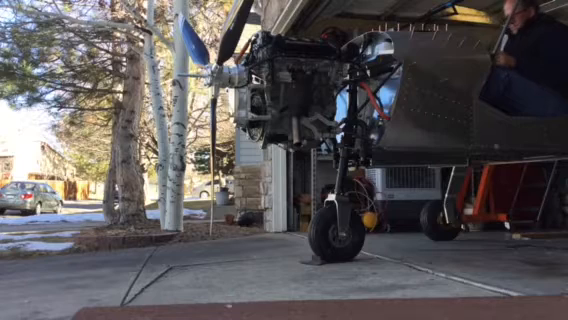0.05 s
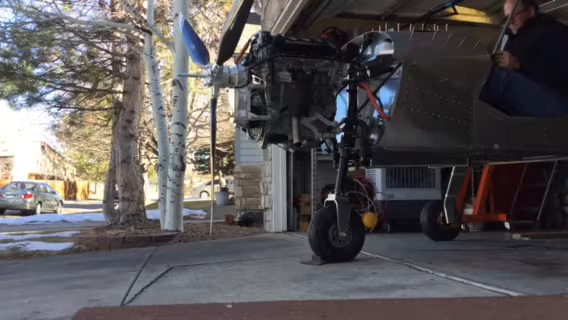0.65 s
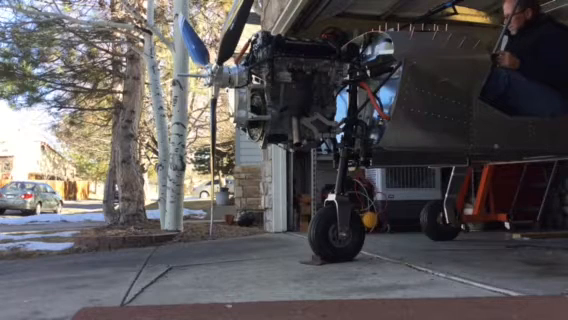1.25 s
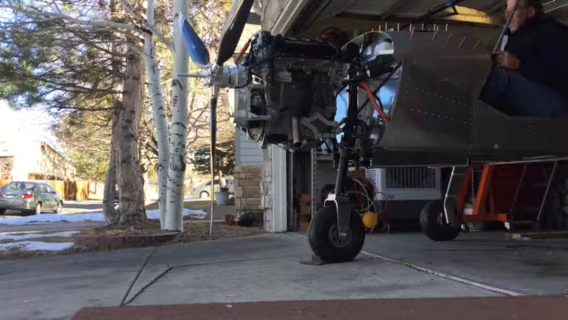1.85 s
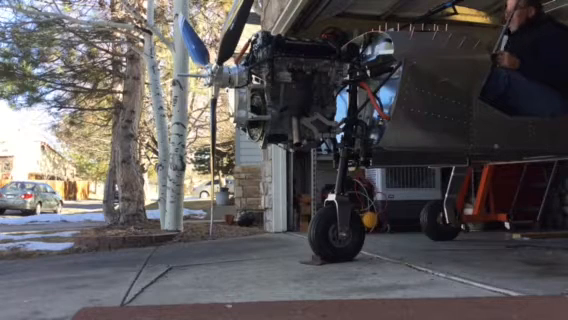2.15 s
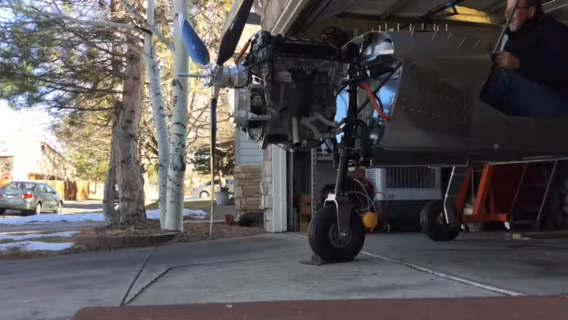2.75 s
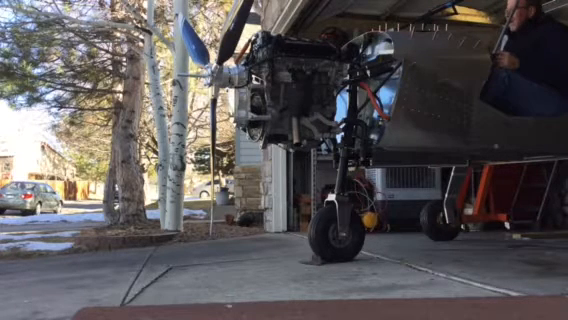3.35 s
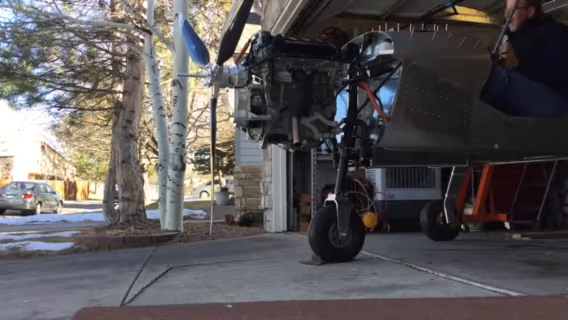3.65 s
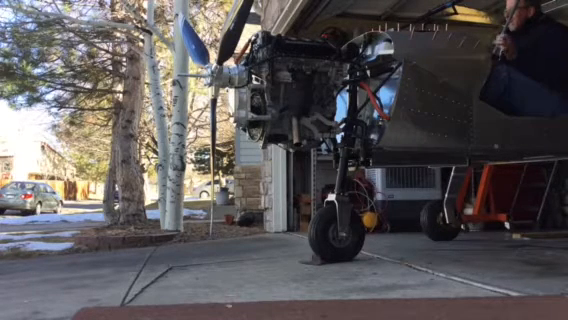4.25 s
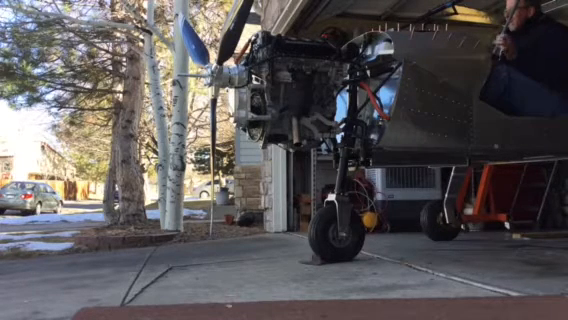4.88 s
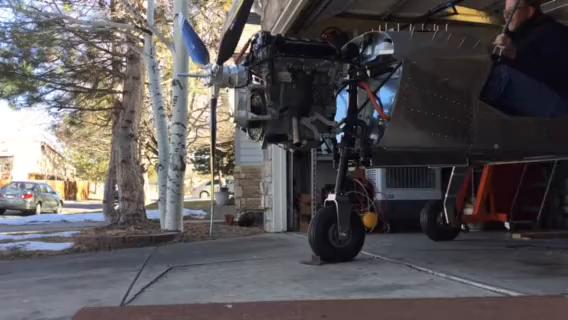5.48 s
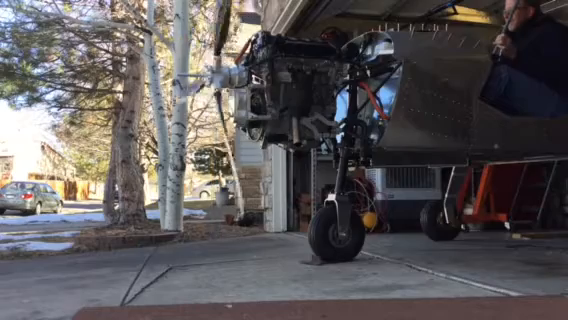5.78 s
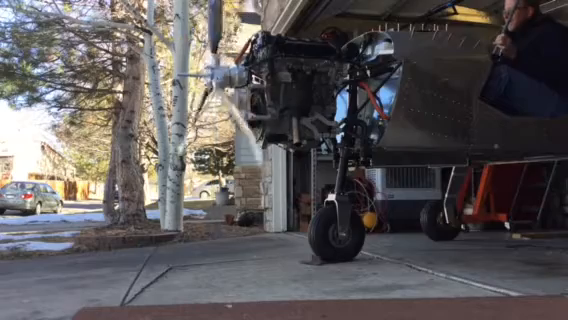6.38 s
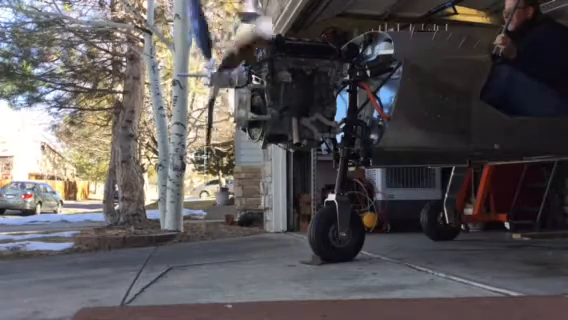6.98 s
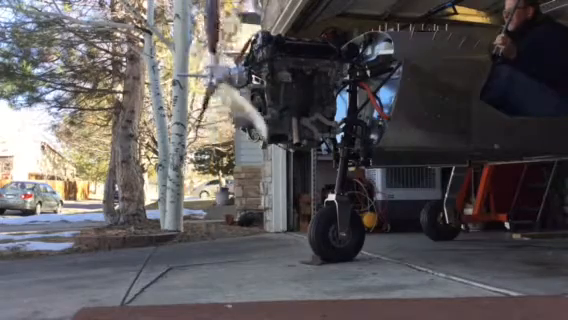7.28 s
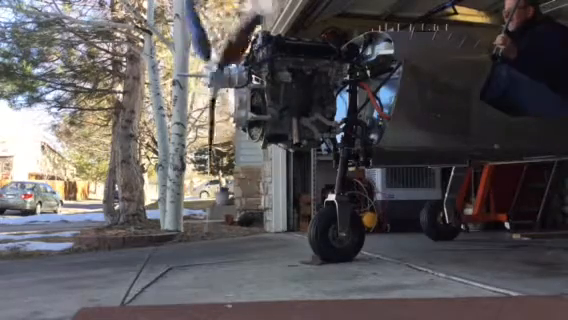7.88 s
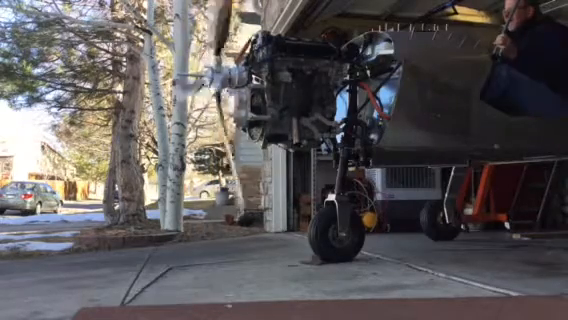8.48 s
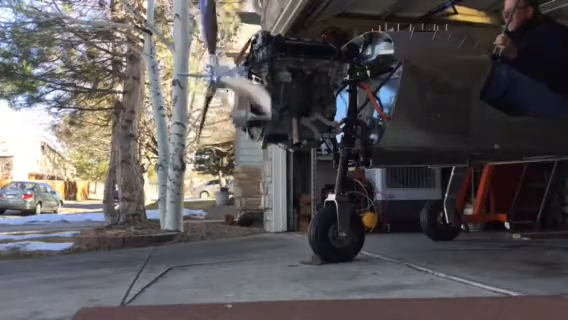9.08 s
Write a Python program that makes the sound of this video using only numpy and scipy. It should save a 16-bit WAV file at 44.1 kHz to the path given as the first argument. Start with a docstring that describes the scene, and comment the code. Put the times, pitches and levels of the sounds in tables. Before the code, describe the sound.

A low rumble and light clicks, then a starter clacks in and cranks a small aircraft engine with ringing metallic chatter, never firing.

```python
"""A low rumble with a faint hum and a few light clicks, in an open garage where a small aircraft engine
stands. Then the starter pinion slams in and cranks engine and propeller without a firing.
The gears slow and groan on every compression, rattle loose in between,
and keep the steel ring gear ringing."""
import sys
import numpy as np
from scipy import signal
from scipy.fft import rfft, irfft
from scipy.io import wavfile
from scipy.ndimage import uniform_filter1d

SR = 44100
rng = np.random.default_rng(int(sys.argv[2]) if len(sys.argv) > 2 else 0)


def dump_mix(stems):
    """Bounce the given channels to the path in sys.argv[1] as a 16-bit WAV at rate SR."""
    frames = np.atleast_2d(stems).T  # one column per channel
    limited = np.clip(frames, -1, 1)  # hard clip at full scale
    pcm = np.round(limited * 32767).astype(np.int16)
    wavfile.write(sys.argv[1], SR, pcm)


N = 407043
T = np.arange(N) / SR


def undb(db):
    """Decibels to gain."""
    return 10 ** (np.asarray(db) / 20)


def unit(x):
    """Scale to rms 1 over the time in which it sounds."""
    sounding = np.abs(x) > np.abs(x).max() * 1e-4
    return x / np.sqrt(np.mean(x[sounding] ** 2))


def curves(table):
    """Table columns interpolated over time."""
    time_s, *columns = np.transpose(table)
    return [np.interp(T, time_s, column) for column in columns]


def walk(rate_hz):
    """Smooth random wander, rms 1."""
    hold = int(SR / rate_hz)
    steps = np.repeat(rng.standard_normal(N // hold + 1), hold)
    return unit(uniform_filter1d(steps, hold)[:N])


def colour(x, points, size=8192):
    """Minimum-phase filter through (freq_hz, gain_db) points."""
    hz, db = np.transpose(points)
    bins_hz = np.maximum(np.arange(size // 2 + 1) * SR / size, 1)
    gain = undb(np.interp(np.log(bins_hz), np.log(hz), db))
    cepstrum = irfft(np.log(gain))
    cepstrum[1:size // 2] *= 2
    cepstrum[size // 2 + 1:] = 0
    return signal.oaconvolve(x, irfft(np.exp(rfft(cepstrum))))[:len(x)]


def noise(points, envelope=1):
    """Enveloped, coloured noise, rms 1."""
    return unit(colour(rng.standard_normal(N) * envelope, points))


def ring(x, modes):
    """Parallel resonators; alternating signs keep the valleys smooth."""
    return sum((-1) ** k * undb(db) * signal.lfilter(*signal.iirpeak(hz, hz / width_hz, fs=SR), x)
               for k, (hz, width_hz, db) in enumerate(modes))


def fade(t, t60_s):
    """Decay by 60 dB in t60_s."""
    return np.exp(-np.log(1000) * t / t60_s)


# Rumble levels: time_s, deep_db, upper_db
RUMBLE_LEVELS = [(0.0, -32, -36), (0.8, -33.5, -38), (1.7, -36, -38), (2.3, -38, -37), (2.65, -35.5, -33.5),
                 (3.3, -41.5, -36.0), (4.2, -38, -36.5), (5.0, -44.5, -39.6), (6.0, -45, -38),
                 (6.55, -37, -37.5), (7.05, -42, -41.5), (7.3, -34, -37.5), (8.1, -36, -35),
                 (8.8, -37.5, -39), (9.23, -36.5, -32.5)]
# Rumble band spectra: freq_hz, gain_db
DEEP_SPECTRUM = [(20, -29), (32, -21), (50, 0), (62, 3.5), (86, 9), (115, 1.5), (150, -15), (300, -42.5),
                 (1000, -81)]
UPPER_SPECTRUM = [(20, -62), (70, -35.5), (130, 1), (160, -3), (195, -4), (235, -12), (310, -26),
                  (450, -30.5), (1200, -71)]
def rumble():
    """Two low noise bands that flutter together."""
    deep_db, upper_db = curves(RUMBLE_LEVELS)
    flutter = undb(1.67 * walk(32))
    deep = undb(deep_db - .13) * noise(DEEP_SPECTRUM, flutter)
    upper = undb(upper_db - .25) * noise(UPPER_SPECTRUM, flutter)
    return deep + upper


# Hum tones: pitch_hz, level_db
HUM_TONES = [(485, -57.5), (523, -67.5), (786, -65.5), (1308, -75), (3190, -83.5), (3919, -80.5),
             (4177, -82.5)]
def hum():
    """Thin tones, wavering in level and phase."""
    return sum(undb(db + 1.7 * walk(4.024)) * np.sqrt(2) * np.sin(2 * np.pi * hz * T + .35 * walk(20))
               for hz, db in HUM_TONES)


# Air spectrum: freq_hz, gain_db
AIR_SPECTRUM = [(100, 13), (220, 32), (260, 38.5), (300, 30.5), (370, 28.5), (450, 18.5), (650, 13.5),
                (900, 6.5), (1250, 7), (1500, -2), (2000, -6.5), (3000, -7.5), (4800, -4), (7300, -13),
                (9500, -6.5), (12000, -1), (16000, -14)]
def air(level_db=-45.5):
    """The steady hush of still air."""
    return undb(level_db) * noise(AIR_SPECTRUM)


# Buzz spectrum: freq_hz, gain_db
BUZZ_SPECTRUM = [(200, -32), (1100, -5), (1700, -1), (2600, 1.5), (3500, -6), (5000, 1), (7000, -13),
                 (16000, -25)]
def buzz(pitch_hz=43.3, level_db=-70.5):
    """A faint buzz: one rough cycle repeating at a wavering rate."""
    phase = np.cumsum(pitch_hz * (1 + .001 * walk(1.5))) / SR % 1
    cycle = rng.standard_normal(1024)
    wave = cycle[(phase * len(cycle)).astype(int)]
    return undb(level_db) * unit(colour(wave, BUZZ_SPECTRUM))


def knocks(table, spectrum, t60_s, tail_db, tail_t60_s):
    """Short cracks, each with a ping and a brief room tail."""
    out, t = np.zeros(N), T[:SR // 2]
    envelope = fade(t, t60_s) + undb(tail_db) * fade(t, tail_t60_s)
    for start_s, gain_db, ping_hz, ping_db, ping_t60_s in table:
        crack = colour(rng.standard_normal(len(t)) * envelope, spectrum)
        ping = undb(ping_db) * np.sin(2 * np.pi * ping_hz * t) * fade(t, ping_t60_s)
        i = int(start_s * SR)
        out[i:i + len(t)] += 2 * undb(gain_db) * (crack + ping)
    return out


# Clicks: start_s, gain_db, ping_hz, ping_db, ping_t60_s
CLICK_HITS = [(.1505, -35.5, 1340, 0, 0.033), (.548, -36, 5530, -9, .13), (.55, -31.5, 5500, 1, .012),
              (.5535, -33.5, 840, -17, 0.025), (2.8, -62, 1600, 6, .02)]
# Click spectrum: freq_hz, gain_db
CLICK_SPECTRUM = [(30, -36), (200, -4), (500, 5.5), (950, 10.5), (1700, 2), (2500, -8), (4000, 0),
                  (5600, 0), (6800, -14), (12000, -11.5), (16000, -15)]
def clicks():
    """Two light clicks, later a much fainter tick."""
    return knocks(CLICK_HITS, CLICK_SPECTRUM, t60_s=.018, tail_db=-13, tail_t60_s=.19)


# Solenoid and pinion impacts: start_s, gain_db, ping_hz, ping_db, ping_t60_s
PINION_HITS = [(5.7755, -44, 1295, 5, 0.042), (5.7865, -19, 1260, -5, 0.043),
               (5.795, -16, 1125, -31, 0.088), (5.803, -32, 1000, 2, 0.16)]
# Impact spectrum: freq_hz, gain_db
PINION_SPECTRUM = [(100, -2), (600, -7.5), (1100, 5), (1500, 2), (2400, -6), (4000, -0.5), (7000, -9),
                   (9500, -19), (12500, -11), (16000, -30)]
def pinion_slam():
    """The solenoid throws the pinion into the ring gear."""
    return knocks(PINION_HITS, PINION_SPECTRUM, t60_s=.055, tail_db=-6.5, tail_t60_s=.42)


TURN_S = .23126  # one crank turn at full cranking speed
def compressions(beat_from_s=5.9248, limp_s=.002):
    """Two compressions a turn, every second one late; the first few are slower and heavier."""
    k = np.arange(int((T[-1] - beat_from_s) / TURN_S * 2) + 1)
    run_up, second = np.exp(-k / .85), k % 2
    times_s = beat_from_s + k * TURN_S / 2 + limp_s * second - .04 * run_up
    load_db = .6 + 3 * run_up
    chatter_db = np.where(second, 0, 4.7)
    return times_s, load_db, chatter_db


def strokes(delay_s, width_s, gain_db=0):
    """A smooth hump at each compression, wider while the crank is slow."""
    times_s = compressions()[0]
    slowness = np.gradient(times_s) / np.median(np.diff(times_s))
    grid_s = T[::50]
    humps = np.exp(-.5 * ((grid_s[:, None] - times_s - delay_s) / (width_s * slowness ** 2)) ** 2)
    return np.interp(T, grid_s, np.sum(undb(gain_db) * humps, axis=1))


def teeth(tooth_phase, scatter_db):
    """One impact of random size each time a tooth meets."""
    hits = np.flatnonzero(np.diff(np.floor(tooth_phase)) > 0)
    out = np.zeros(N)
    out[hits] = undb(scatter_db * rng.uniform(-1.03, 1, len(hits)))
    return out / np.sqrt(np.mean(out[hits[0]:] ** 2))


def cylinder_puffs():
    """The cylinders push out a soft puff of air on each stroke."""
    return undb(-46) * noise(DEEP_SPECTRUM, strokes(delay_s=.00075, width_s=.0054))


# Gear whine: tooth_harmonic, gain_db
WHINE_HARMONICS = [(1, -8.5), (2, -2.5), (3, -5.5), (4, -33), (5, -15.5), (6, -26)]
def gear_groan(tooth_phase, load, speed):
    """The mesh groans under load; its third harmonic sings between strokes."""
    whine = sum(undb(db + 2.7 * walk(160)) * np.sin(2 * np.pi * k * tooth_phase)
                for k, db in WHINE_HARMONICS)
    groan = undb(-26) * whine * (load + .024) * speed ** 3
    sing = undb(-32.5) * np.sin(2 * np.pi * 3 * tooth_phase) * strokes(delay_s=.042, width_s=.0052)
    return groan + sing


# Crankcase response: freq_hz, gain_db
CASE_SPECTRUM = [(150, -1), (400, 0.5), (600, -4.5), (850, -3), (1050, 8), (1300, 1.5), (1750, 8.5),
                 (2050, 3.5), (2400, 9.5), (2680, -15.5), (3600, -7), (5500, 1), (8000, -21), (16000, -54)]
# Starter mount bending modes: freq_hz, width_hz, gain_db
MOUNT_MODES = [(2251, 10, 0), (2525, 25, -19), (2975, 30, -11), (3309, 30, -3), (3810, 50, -12)]
def case_and_mount(tooth_phase, scrape, drive, load):
    """Loaded teeth strike and scrape, shaking the crankcase and bending the mount."""
    force = (teeth(tooth_phase, scatter_db=8) + 2.5 * scrape) * drive
    case = undb(-33.5) * unit(colour(force * (load + .16), CASE_SPECTRUM))
    mount = undb(-31) * unit(ring(force * drive * (load + .11), MOUNT_MODES))
    return case + mount


# Rattle spectrum: freq_hz, gain_db
RATTLE_SPECTRUM = [(200, 0.5), (360, 4), (600, -6), (1000, -2), (1650, 0.5), (2050, -1), (2350, -0.5),
                   (2680, 0.5), (3300, 0.5), (4200, 5), (4780, -1.5), (5600, 7), (7000, -23), (8200, -9),
                   (11000, -13), (13000, -3.5), (15500, -17.5)]
# Modes of small steel parts: freq_hz, width_hz, gain_db
PART_MODES = [(5860, 100, 2), (6658, 85, 7.5), (6684, 29, 5.5), (7340, 43, -4), (7370, 50, 2.5),
              (7960, 52, -2), (8280, 60, -3.5), (8480, 30, -1.5), (8940, 76, -7.5), (9470, 33, -6),
              (9900, 45, -20), (10400, 250, -9), (11760, 156, -8), (13070, 82, -4.5), (13950, 84, -12.5)]
def backlash_rattle(tooth_phase, scrape, drive, stroke_db):
    """Past the top of each stroke the backlash opens and the teeth chatter."""
    unloaded = np.exp(-.7 * strokes(delay_s=.0038, width_s=.0059))
    slack = unloaded * (.62 + strokes(delay_s=.047, width_s=.034, gain_db=stroke_db))
    bounce_phase = 1.4 * tooth_phase + .25 * walk(400) * (drive > 0)
    bounces = teeth(bounce_phase, scatter_db=1) + 1.8 * scrape
    # the same worn teeth come round on every turn
    wear_db = 2.2 * np.resize(walk(239.5)[:int(TURN_S * SR)], N)
    chatter = bounces * slack * drive ** 3 * undb(wear_db + 1.6 * walk(110))
    rattle = undb(-31.5) * unit(colour(chatter, RATTLE_SPECTRUM))
    return rattle + undb(-27.5) * unit(ring(chatter, PART_MODES))


# Ring gear modes: freq_hz, width_hz, gain_db
GEAR_MODES = [(2251, 11, -7), (2973, 30, -14), (3308, 26, -2), (3808, 32, -8), (3950, 40, -8),
              (4410, 50, -8), (4471, 34, 0), (5058, 16, 0), (5113, 18, 1), (5240, 110, -9), (5789, 24, -11),
              (5965, 70, -12), (6625, 55, -6), (6740, 100, -8)]
def ring_gear(tooth_phase, scrape, drive):
    """Tooth blows keep the steel ringing; each mode wavers in level."""
    blows = (teeth(tooth_phase, scatter_db=8) + 1.6 * scrape) * drive
    ringing = sum(ring(blows, [mode]) * undb(2.5 * walk(80)) for mode in GEAR_MODES)
    return undb(-25) * unit(ringing)


# Clangs, timed from each turn's first compression: offset_s, pitch_hz, peak_db, swell_s, decay_s
TURN_CLANGS = [(-.021, 4471, -20.5, 0.0072, 0.0057), (-.006, 5113, -18.5, 0.0079, 0.0062),
               (.019, 5100, -22, 0.0052, 0.019), (.043, 4471, -22, 0.0073, .018),
               (.08, 6656, -26, 0.0082, 0.0042), (.112, 3808, -35, .008, 0.0036),
               (.12, 2251, -29.5, .003, 0.047), (.124, 3308, -23, 0.0066, 0.0094),
               (.158, 4471, -25.5, 0.0042, 0.004)]
def clangs(speed, spread_hz=73, detune_hz=18.6, others_db=-8.5, scatter_db=1.8):
    """At the same places in each turn the teeth fall in step with a ring gear mode, which swells."""
    out, t = np.zeros(N + SR), np.arange(-SR // 25, SR // 10) / SR
    mode_hz, _, mode_db = np.transpose(GEAR_MODES)[:, :, None]
    turns_s = compressions()[0][::2]
    for offset_s, pitch_hz, peak_db, swell_s, decay_s in TURN_CLANGS:
        weight = np.exp(-((mode_hz - pitch_hz) / spread_hz) ** 2) + undb(mode_db + others_db)
        detuned_hz = mode_hz + detune_hz * rng.uniform(-.98, 1, mode_hz.shape)
        modes = weight * np.exp(2j * np.pi * detuned_hz * t)
        envelope = np.exp(np.minimum(t / swell_s, -t / decay_s))
        for turn_s in turns_s:
            phasors = np.exp(2j * np.pi * rng.random(mode_hz.shape))
            tone = unit(np.sum(phasors * modes, axis=0).real)
            i = int((turn_s + offset_s + t[0]) * SR)
            out[i:i + len(t)] += undb(peak_db + scatter_db * rng.standard_normal()) * tone * envelope
    return out[:N] * speed ** 2


# Starter run-up: time_s, free_running_tooth_hz, drive_db
STARTER_RUN = [(5.785, 149.7, -60), (5.81, 240.3, -25), (5.85, 328.4, -1), (5.94, 442.4, 1),
               (6.04, 475.8, 1), (6.2, 505.7, 1.5), (6.5, 523.3, 1.5), (9.23, 519.8, 1.5)]
def starter(max_drag=.195):
    """The pinion drives the ring gear; each compression drags the motor to a labouring speed."""
    free_hz, drive_db = curves(STARTER_RUN)
    speed = free_hz / free_hz.max()
    drive = undb(drive_db) * (T > STARTER_RUN[0][0])
    times_s, load_db, chatter_db = compressions()
    uneven_db = .33 * rng.standard_normal(len(times_s))
    load = strokes(delay_s=.00015, width_s=.013, gain_db=load_db + uneven_db)
    resistance = 1.1 * strokes(delay_s=-.015, width_s=.02) + 2 * strokes(delay_s=.008, width_s=.012)
    tooth_hz = free_hz * (1 - max_drag * np.tanh(resistance)) * (1 + .023 * walk(400))
    tooth_phase = np.cumsum(tooth_hz * (drive > 0)) / SR
    groan = gear_groan(tooth_phase, load, speed) * drive
    scrape = rng.standard_normal(N) * np.exp(-(tooth_phase % 1) / .32)
    body = case_and_mount(tooth_phase, scrape, drive, load)
    rattle = backlash_rattle(tooth_phase, scrape, drive, chatter_db + uneven_db)
    ringing = ring_gear(tooth_phase, scrape, drive)
    return groan + body + rattle + ringing + cylinder_puffs() + clangs(speed)


def garage(x, t60_s, wet_db):
    """Dense reflections from floor, walls and fuselage."""
    t = T[:SR // 2]
    echo = rng.standard_normal(len(t)) * fade(t, t60_s) * (t > .004)
    return x + undb(wet_db) * signal.oaconvolve(x, echo / np.linalg.norm(echo))[:N]


def scene():
    """All sources at one microphone."""
    impacts = clicks() + pinion_slam()
    background = rumble() + hum() + air() + buzz()
    mono = background + impacts + garage(starter(), t60_s=.39, wet_db=-9)
    return np.array([mono, mono])


def record(dry):
    """Cut the deepest bass and the top."""
    low_cut = signal.butter(4, 38, "highpass", fs=SR, output="sos")
    high_cut = signal.ellip(10, .2, 70, 15650, fs=SR, output="sos")
    return signal.sosfilt(high_cut, signal.sosfilt(low_cut, dry))


dry = scene()
out = record(dry)
dump_mix(out)
```